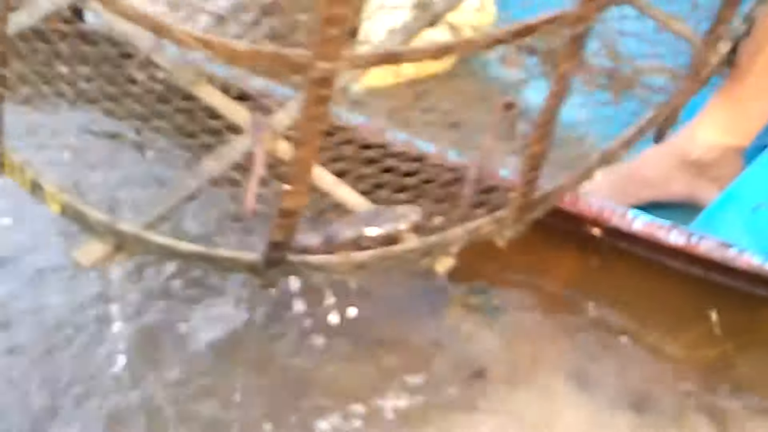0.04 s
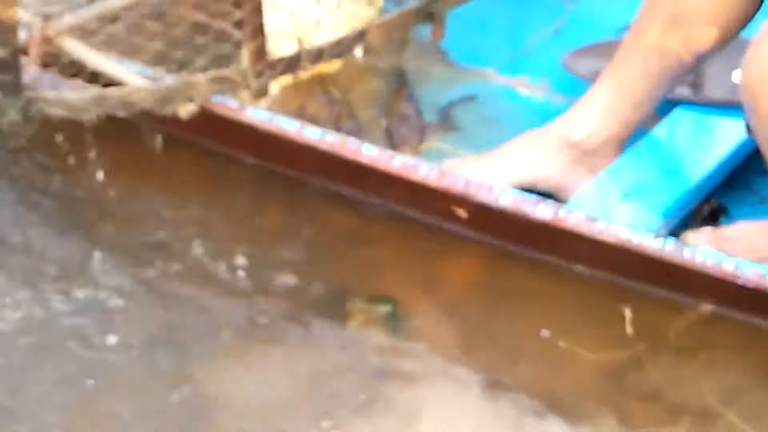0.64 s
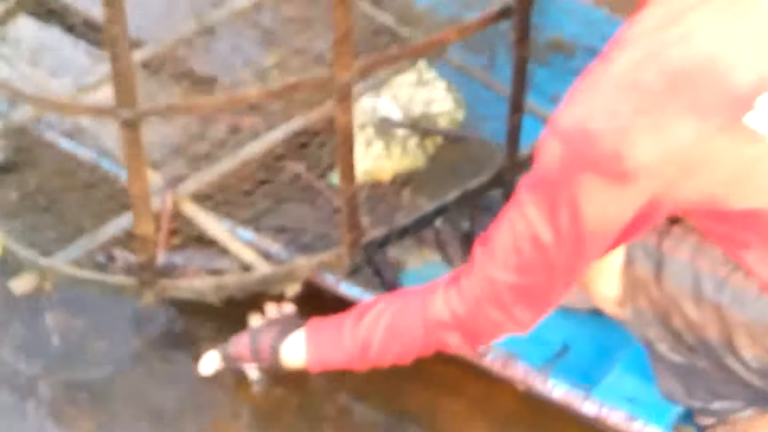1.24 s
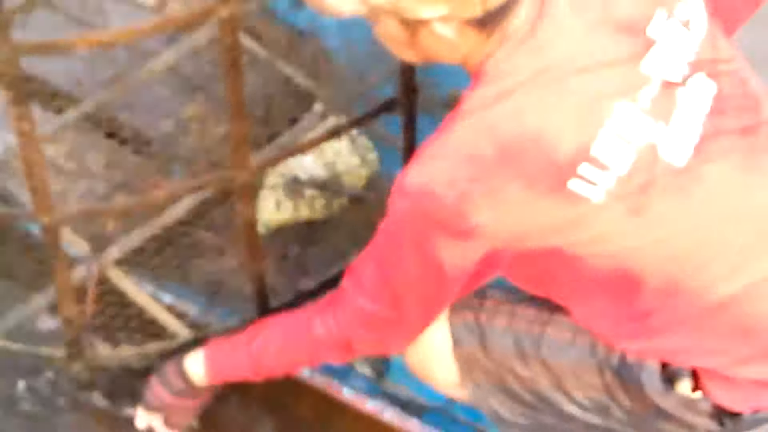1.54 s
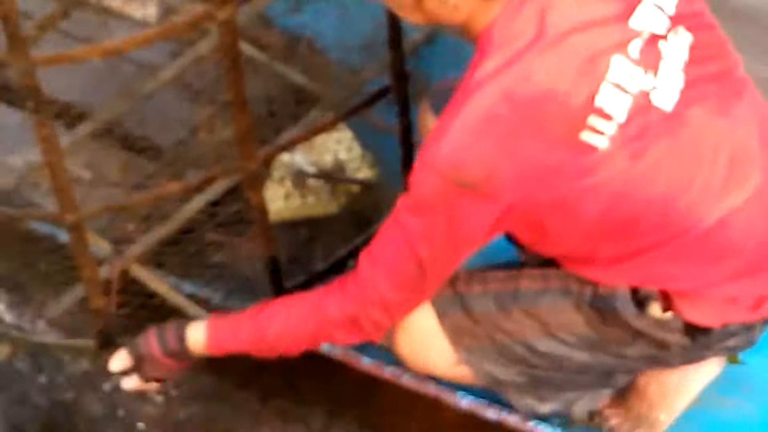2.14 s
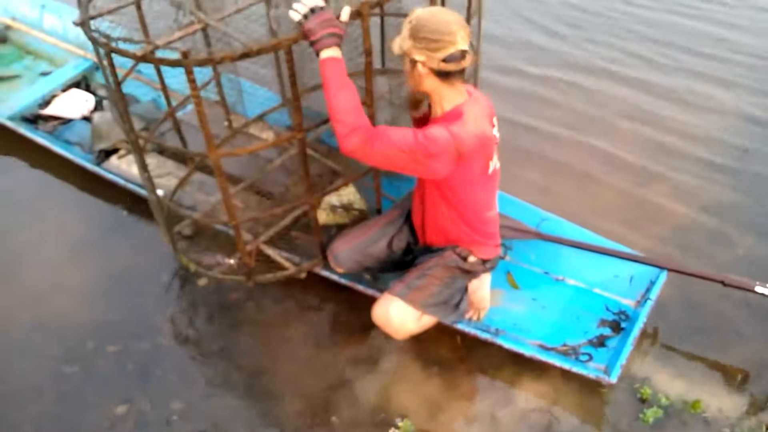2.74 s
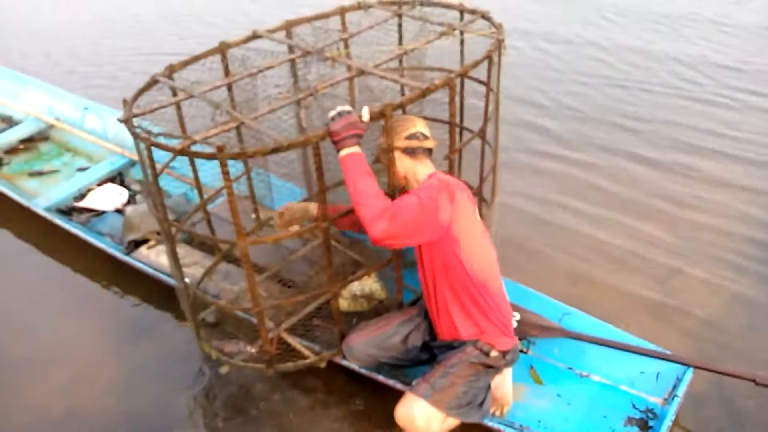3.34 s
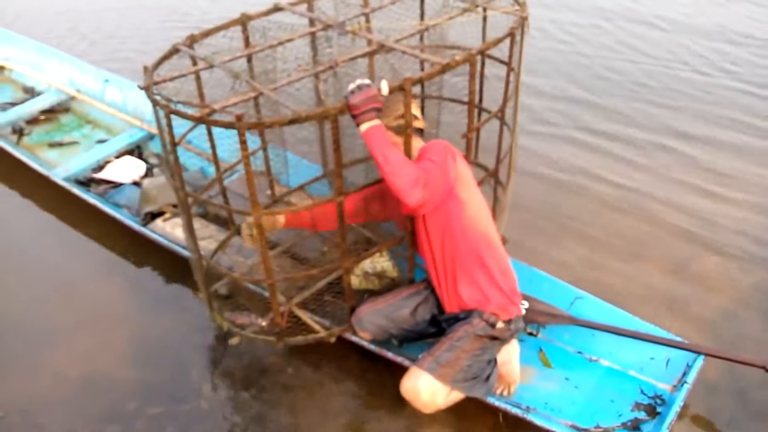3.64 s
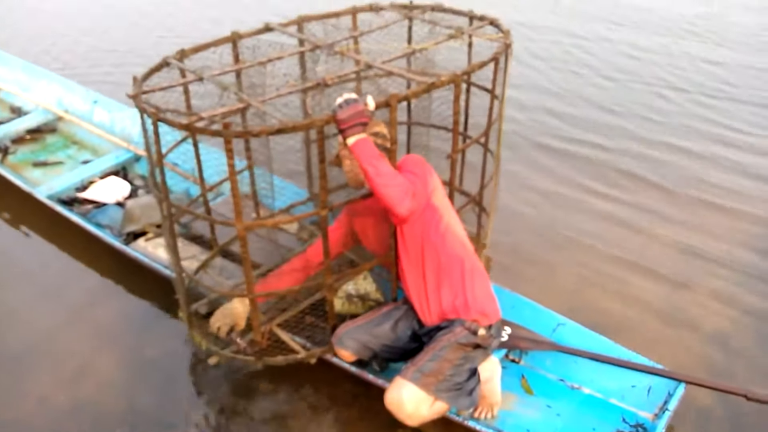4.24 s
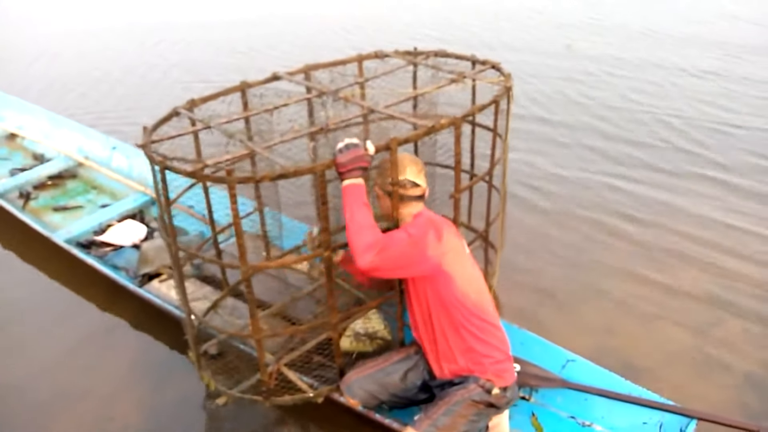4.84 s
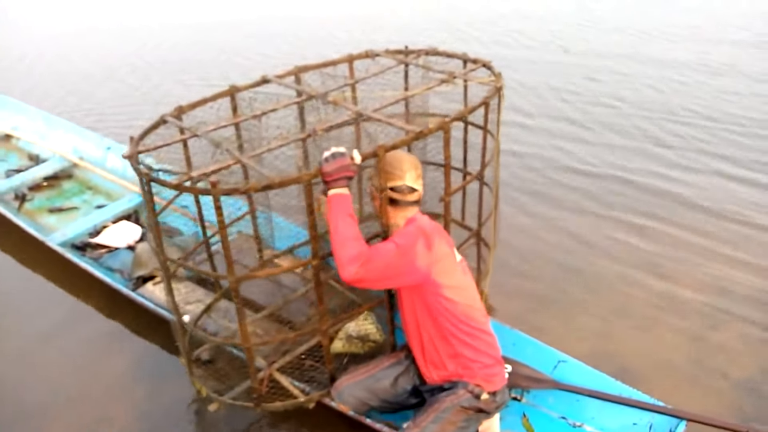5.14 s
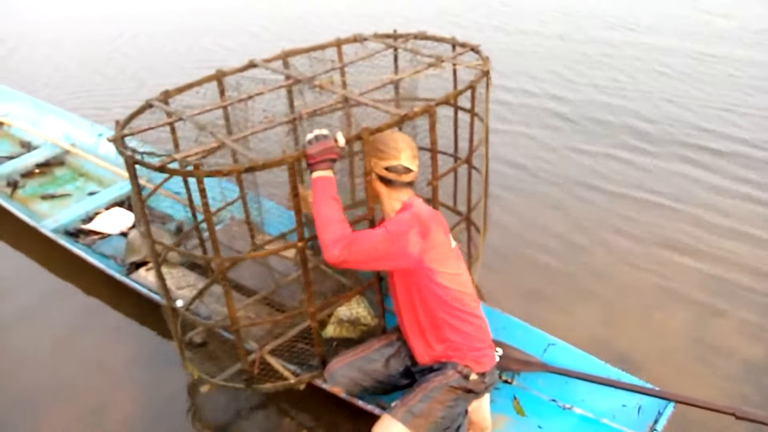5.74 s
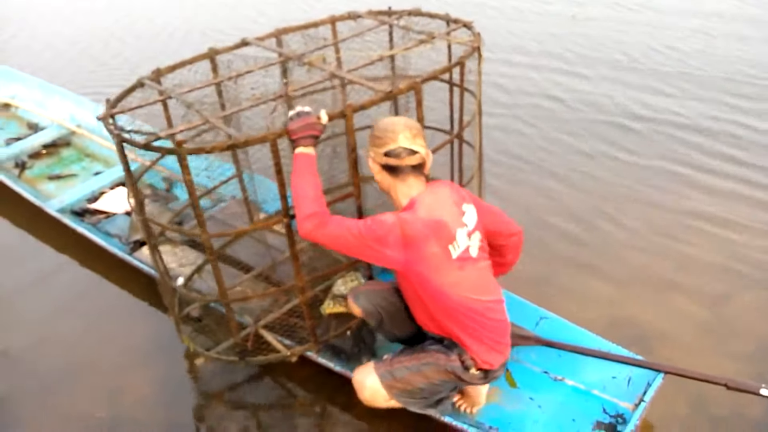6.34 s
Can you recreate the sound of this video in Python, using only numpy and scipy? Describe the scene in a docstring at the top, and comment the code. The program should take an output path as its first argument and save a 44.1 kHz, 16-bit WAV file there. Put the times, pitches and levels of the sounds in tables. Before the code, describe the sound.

A steel-rod fish trap plunges into a calm river with a splash and a gulp, then scrapes along a small boat, whose hull groans and booms low. Water fizzes and drips from the mesh, and the rods clack sharply twice on the rim. Faint insects and birds follow, with a few light clicks and a soft thump last. The boat sounds fairly near, over a far rumble and open-air hiss.

```python
"""A steel-rod fish trap is worked over the side of a small boat on a calm river.
It plunges at 0.5 s with a splash and a gulp of trapped air, then drags along the hull, which
groans and booms as it rocks. Water drains from the mesh, each drip ringing as a bubble, and
near 3.7 s the rods clack twice on the rim. Insects buzz and birds call on the bank; a few rod
clicks and a soft boom come last. A low, far rumble and a hiss of open air run throughout."""
import sys
import numpy as np
from scipy import signal
from scipy.fft import rfft, irfft
from scipy.io import wavfile

SR = 44100
rng = np.random.default_rng(int(sys.argv[2]) if len(sys.argv) > 2 else 0)


def materialize(psi):
    """Save the field psi as 16-bit PCM at rate SR to the path in sys.argv[1].

    A 1-D psi becomes a single channel; in a 2-D psi each row is a channel.
    """
    bounded = np.clip(np.atleast_2d(psi).T, -1, 1)
    quanta = np.round(bounded * 32767).astype(np.int16)
    wavfile.write(sys.argv[1], SR, quanta)


N = 286650
TIME_S = np.arange(N) / SR


# air pockets: t/s, level/dB, f/Hz
AIR_POCKETS = [(.5399, -14, 1137), (.5402, -17, 657), (.541, -23, 1700), (.55, -22.5, 666),
               (.552, -23, 1300), (.5619, -16, 532), (.5735, -23, 765), (.58, -25, 251), (.585, -24.5, 830)]
def gulps(plunge_s=.54, rise=.015, froth_db=-14, muffle_hz=1850):
    """Air pockets shut by the plunge ring briefly, rising as they shrink; water muffles them."""
    out, t = np.zeros(N), np.arange(5000) / SR
    for s, db, hz in AIR_POCKETS:
        peak_s = (1.93 + 69 * (s - plunge_s)) / hz  # later pockets lie deeper, swell for more cycles
        turns = np.cumsum(hz * (1 + rise * np.tanh(t / peak_s - 1))) / SR
        froth = unit_rms(band(rng.standard_normal(len(t)), hz / 2, hz * 1.63))
        add(out, s, amp(db) * swell(t, peak_s) * (np.sin(2 * np.pi * turns) + amp(froth_db) * froth))
    return signal.sosfilt(signal.butter(6, muffle_hz, fs=SR, output="sos"), out)


# trap blows on the hull: t/s, level/dB, f_low/Hz, f_high/Hz, t60 factor
BLOWS = [(.074, -46, 150, 950, 1.4), (.192, -43.5, 171, 420, 2.1), (0.5409, -30, 800, 1750, 0.31),
         (0.5728, -35, 500, 2200, 0.24), (0.6519, -42, 553, 1180, 3.2), (.8635, -41, 294, 2100, 0.94),
         (1.028, -41, 180, 880, 1), (1.059, -41.5, 495, 3060, 1.7), (1.582, -54.5, 550, 1000, .4),
         (1.6603, -47.5, 300, 6000, 0.1), (2.268, -48.5, 70, 1080, .6), (3.1226, -34.5, 150, 850, 0.11),
         (3.6686, -22, 204, 6740, 1.1), (3.7496, -23, 168, 6070, 1.24), (3.7561, -32.5, 169, 3200, 0.19),
         (3.7826, -33, 230, 890, 0.36), (4.174, -46, 130, 510, 0.46), (6.028, -50, 915, 3430, 1.8),
         (6.3332, -49, 130, 1150, 1.3)]
def knocks(tick_hz=5400, tick_s=.00021, hard_hz=6040):
    """Hard contact reaches the high modes and makes the rod tick; a pressing hand shortens the ring."""
    out, t = np.zeros(N), np.arange(8192) / SR
    glide = 1 + .085 * np.exp(-t / .0029)
    tick = swell(t, tick_s) * np.sin(2 * np.pi * tick_hz * t * glide)
    for s, db, low_hz, high_hz, ring in BLOWS:
        body = band(hull(t, ring), low_hz, high_hz)
        tick_db = 14.5 + 8.5 * np.log2(high_hz / hard_hz)
        add(out, s, amp(db) * (body / body[t < .01].std() + amp(tick_db) * tick))
    return out


# clear hull modes: f/Hz, level/dB, t60/s
HULL_MODES = [(135, -14, .16), (197, -12, .15), (280, -2, .18), (368, -1, .08), (587, -10, .11),
              (783, -3, .085), (945, 1, .06), (1163, -8, .075), (1245, -9, .06), (1595, -11, .05),
              (1707, -11, .055), (1910, -11, .055), (2207, -4, .045), (2422, -5, .035), (2560, -5, .035),
              (3394, -5, .04), (3870, -6, .04), (4188, -8, .035), (4730, -6, .028), (5200, -3, .025),
              (5670, -4, .024)]
# octave bands of crowded modes: f/Hz, level/dB, t60/s
HULL_BANDS = [(100, -12, 0.19), (294, 0.5, 0.14), (484, -11, 0.11), (824, -1.5, 0.088), (1500, -2.5, 0.061),
              (2500, -10, 0.037), (3860, -5.5, 0.027), (8600, -27.5, 0.092)]
def hull(t, ring, crowd_db=-3, onset_s=.015):
    """One blow rings a few clear modes among many weaker, crowded ones."""
    hz, db, t60_s = np.transpose(HULL_MODES)[:, :, None]
    sign = (-1) ** np.arange(len(HULL_MODES))[:, None]
    modes = (sign * amp(db - 60 * t / (t60_s * ring)) * np.sin(2 * np.pi * hz * t)).sum(0)
    noise, crowd = rng.standard_normal(len(t)), 0
    for centre_hz, band_db, band_t60_s in HULL_BANDS:
        octave = band(noise, centre_hz / np.sqrt(2), centre_hz * np.sqrt(2))
        crowd = crowd + octave * amp(band_db - 60 * t / (ring * band_t60_s))
    early = t < onset_s
    return modes / modes[early].std() + amp(crowd_db) * crowd / crowd[early].std()


# rocking and leaning loads: t/s, level/dB, f/Hz, swell/s
HULL_LOADS = [(.567, -18.5, 178, 0.0062), (.605, -21, 194, 0.0024), (.858, -31, 149, 0.0075),
              (1.157, -21.5, 106, 0.024), (1.165, -24, 196.6, 0.019), (1.5094, -11.5, 160, 0.0085),
              (1.564, -22, 130.4, 0.01), (1.584, -18.5, 149.5, 0.0076), (1.619, -27, 120, 0.012),
              (1.659, -19.5, 117.3, 0.011), (2.271, -30, 69.4, .0088), (3.1221, -22.5, 130, 0.0021),
              (3.669, -31, 127, 0.009), (3.751, -35.5, 147, 0.0057), (6.334, -34, 186, 0.0045)]
def booms(sag=.24, shudder_db=-17, heave_db=-10, heave_hz=58, full_load_db=-11):
    """Soft loads sound the hull low, heavy ones with brief overtones; the water damps it quickly."""
    out, t = np.zeros(N), np.arange(8000) / SR
    for s, db, hz, peak_s in HULL_LOADS:
        turns = np.cumsum(hz * (1 + sag * (np.exp(-t / peak_s) - .5))) / SR
        shudder = unit_rms(band(rng.standard_normal(len(t)), 140, 280))
        boom = swell(t, peak_s) * (np.sin(2 * np.pi * turns) + amp(shudder_db) * shudder)
        step_db = -8.5 - .45 * (full_load_db - db)  # per overtone; light loads are duller
        boom += amp(heave_db + step_db) * swell(t, peak_s) * np.sin(2 * np.pi * heave_hz * t)
        for k in (1, 2):
            ratio = 1.85 ** k
            overtone = swell(t, .83 * peak_s) ** ratio * np.sin(2 * np.pi * ratio * turns)
            boom += amp(k * step_db) * overtone
        add(out, s, amp(db) * boom)
    return out


def groan(start_s=1.33, length_s=.19, start_hz=98.9, rise_hz=26.2, start_db=-33.5, growth_db=3.5):
    """The trap bears ever harder on the side: the hull judders, rising in pitch and level."""
    load = np.clip((TIME_S - start_s) / length_s, 0, 1)
    turns = np.cumsum(start_hz + rise_hz * load) / SR
    judder = 1 + .35 * unit_rms(band(rng.standard_normal(N), 12.5, 25))
    envelope = amp(start_db + growth_db * load) * hump(start_s, length_s, edge=.3)
    return envelope * judder * np.sin(2 * np.pi * turns)


# rod force on the hull: t/s, relative level/dB
DRAG_FORCE = [(0.61, -39), (0.646, -41.5), (0.654, -38), (0.738, -51), (0.872, -45.5), (1.006, -58),
              (1.042, -43), (1.078, -39), (1.13, -72)]
# scrape spectrum: f/Hz, level/dB
DRAG_SPECTRUM = [(60, -22), (130, 0), (260, 10.5), (410, -6.5), (600, 1), (900, -14), (1200, -2.5),
                 (1500, -18.5), (3200, -22), (8000, -36)]
def drag(gain_db=4):
    """Rust catches and slips on the rim in quick grains."""
    contact = np.interp(TIME_S, [.58, .61, 1.1, 1.16], [0, 1, 1, 0])
    scrape = coloured(grains(N, per_s=1200, spread_db=0), DRAG_SPECTRUM)
    return amp(gain_db) * gain_curve(DRAG_FORCE) * contact * scrape


# loose rods touching: t/s, level/dB
ROD_CONTACTS = [(1.429, -47.5), (3.553, -51.5), (6.043, -49), (6.086, -49.5), (6.278, -53), (6.297, -53.5),
                (6.334, -43.5), (6.42, -49.5)]
def clicks():
    """Rusty rods meet in the hands with a short, gritty click."""
    out = np.zeros(N)
    for s, db in ROD_CONTACTS:
        add(out, s, amp(db) * spray(peak_s=.0017, hz=4700, width=1.16))
    return out


# thrown water: t/s, level/dB, swell/s, f/Hz
THROWN_WATER = [(.002, -48, 0.0092, 4000), (.037, -42.5, 0.0043, 1990), (0.0458, -37, 0.003, 3720),
                (.563, -42, .014, 4200), (.57, -28.5, 0.01, 574), (2.004, -37, 0.0047, 1220),
                (2.015, -39.5, 0.0056, 2540), (2.031, -41.5, 0.0054, 4500), (2.034, -42.5, 0.003, 870),
                (2.176, -50.5, 0.011, 4840), (3.116, -54, 0.027, 4000)]
def splashes():
    """Water thrown up by the trap lands in clouds of tiny impacts."""
    out = np.zeros(N)
    for s, db, peak_s, hz in THROWN_WATER:
        add(out, s, amp(db) * spray(peak_s, hz, width=1.5))
    return out


# drops off the mesh: t/s, level/dB, f/Hz
LARGE_DROPS = [(.978, -45.5, 2480), (1.783, -44.5, 700), (1.833, -46, 1220), (2.165, -52, 1230),
               (2.319, -43, 1400), (3.065, -40, 1860), (3.102, -35.5, 2340), (3.122, -31.5, 2500),
               (3.137, -37, 1250), (3.148, -42, 1190), (3.161, -37.5, 1540), (3.334, -47, 1950),
               (3.396, -41, 1670), (3.457, -42, 2140), (3.467, -45, 3100), (3.467, -44.5, 723),
               (3.591, -46.5, 2630), (6.296, -43, 1920)]
def drips(spatter_db=-11):
    """Each large drop spatters and traps a ringing bubble."""
    out = np.zeros(N)
    for s, db, hz in LARGE_DROPS:
        add(out, s, amp(db) * bubble(hz))
        add(out, s, amp(db + spatter_db) * spray(peak_s=.003, hz=3600, width=1.88))
    return out


# spells of small drops: t_start/s, t_end/s
DRIZZLE_SPANS = [(1.75, 2.36), (3.03, 3.66)]
def drizzle(count=12, max_db=-45.5, spread_db=9, low_hz=1267, high_hz=3250):
    """Small, uneven drops ring as bubbles between the large ones."""
    out = np.zeros(N)
    for start_s, end_s in DRIZZLE_SPANS:
        for k, (jitter, faintness, pitch) in enumerate(rng.random((count, 3))):
            s = start_s + (end_s - start_s) * (k + jitter) / count
            hz = low_hz * (high_hz / low_hz) ** pitch
            add(out, s, amp(max_db - spread_db * faintness) * bubble(hz))
    return out


# mesh shedding water: t/s, relative level/dB, rise/s, hold/s
MESH_POURS = [(0, -59, 0.009, 0.036), (0.517, -54.5, 0.023, 0.57), (1.48, -53, 0.2, 0.19),
              (3.026, -57, 0.037, 0.073), (3.453, -66, 0.11, 0.091)]
# fizz spectrum: f/Hz, level/dB
RUNOFF_SPECTRUM = [(600, -7), (1500, -2.5), (2700, -3.5), (3150, 3), (3700, 2.5), (6000, 2.5), (8000, -4)]
def runoff(gain_db=-2, crackle_db=-3, drain_db_per_s=31.5, trickle_db=-68.5):
    """Water fizzes and crackles off the mesh, each pour thinning to a trickle."""
    power = amp(trickle_db) ** 2
    for s, db, rise_s, hold_s in MESH_POURS:
        onset = np.clip((TIME_S - s) / rise_s, 0, 1)
        drained_s = np.maximum(TIME_S - s - rise_s - hold_s, 0)
        power = power + (onset * amp(db - drain_db_per_s * drained_s)) ** 2
    fizz = rng.standard_normal(N) + amp(crackle_db) * droplets()
    return amp(gain_db) * np.sqrt(power) * coloured(fizz, RUNOFF_SPECTRUM)


def droplets(per_s=450, spread_db=3, sizes=24):
    """Tiny bubbles of many sizes burst at random."""
    out = np.zeros(N)
    bubbles = [bubble(hz, cycles=22) for hz in np.geomspace(1300, 8000, sizes)]
    for when, faintness, pitch in rng.random((int(per_s * N / SR), 3)):
        db = -spread_db * np.log(faintness + .02)
        add(out, when * N / SR, amp(db) * bubbles[int(pitch * sizes)])
    return unit_rms(out)


def bubble(hz, cycles=38, rise=.11):
    """A bubble rings down, rising in pitch as it nears the surface."""
    age = np.arange(0, 1, hz / cycles / SR)
    envelope = amp(-45 * age) * (1 - np.exp(-age / .01))
    return envelope * np.sin(2 * np.pi * cycles * age * (1 + rise * age))


# hull pushing water: t/s, length/s, level/dB
HULL_SHOVES = [(0.52, 0.17, -34), (0.775, .15, -41.5), (1.133, .14, -31), (1.258, 0.47, -35.5)]
def churn(low_hz=75, high_hz=230):
    """Water shoved by the hull makes a dull, lumpy noise."""
    motion = sum(amp(db) * hump(s, length_s, edge=.85) for s, length_s, db in HULL_SHOVES)
    return motion * unit_rms(band(grains(N, per_s=450, spread_db=1.5), low_hz, high_hz))


# near insects: t/s, level/dB, f/Hz, rasp/0-1
NEAR_CHIRPS = [(.15, -72, 7350, .8), (1.559, -63.5, 6800, 0.9), (2.56, -67.5, 7160, 1),
               (3.42, -62, 7100, 1), (3.94, -63, 7200, 1), (4.269, -68.5, 7230, 1),
               (4.56, -70.5, 6700, 0.9), (4.955, -60.5, 6760, 1), (5.359, -64, 6860, 1),
               (5.459, -65, 7290, 0.93), (5.75, -66, 7250, 1), (6.319, -58.5, 7280, 0.9)]
def insects(chorus_span_s=(2.4, 3.4), gap_s=.2, chorus_db=-68.5, chorus_hz=7400):
    """Near insects chirp; farther ones take turns in a brief chorus."""
    out = np.zeros(N)
    for s, db, hz, rasp in NEAR_CHIRPS:
        add(out, s, amp(db) * chirp(hz, rasp))
    for s in np.arange(*chorus_span_s, gap_s):
        add(out, s + rng.uniform(0, gap_s / 2), amp(chorus_db) * chirp(chorus_hz, rasp=.9))
    return out


def chirp(hz, rasp, length_s=.206, max_strokes_per_s=110, sweep_hz=130, rasp_hz=270, start_db=-8):
    """Each wing stroke sounds a high resonance that falls a little; the chirp grows, then stops."""
    t = np.arange(0, length_s, 1 / SR)
    stroke = (max_strokes_per_s * rng.uniform(.9, 1) * t) % 1
    noise = rng.standard_normal((2, SR))[:, :len(t)]
    teeth = signal.sosfilt(signal.butter(4, rasp_hz, fs=SR, output="sos"), noise)
    phase = 2 * np.pi * np.cumsum(hz + sweep_hz * (1 - 2 * stroke)) / SR
    tone = (1 + rasp * unit_rms(teeth[0])) * np.cos(phase) + rasp * unit_rms(teeth[1]) * np.sin(phase)
    pulses = abs(np.sin(np.pi * stroke)) ** 1.3
    growth = amp(start_db * (1 - t / t[-1]) ** 2) * signal.windows.tukey(len(t), .05)
    return growth * unit_rms(tone * pulses)


# drooping bird calls: t/s, length/s, level/dB, f/Hz
BIRD_HOOTS = [(2.543, 0.41, -69, 1450), (6.065, 0.26, -70, 1373)]
def birds(song_s=4.03, gap_s=.33, song_db=-65.5, fade_db=.8, twitter_db=-71.5, echo_db=-5):
    """One bird repeats a fading, arched note, another hoots, others twitter; bank trees echo them."""
    out, t = np.zeros(N), np.arange(4000) / SR
    for k in range(6):
        arch_hz = np.array([2950, 4400, 2950]) * (1 + .04 * rng.uniform(-.99, 1, 3))
        add(out, song_s + k * gap_s, amp(song_db - k * fade_db) * whistle(.072, arch_hz))
    for s, length_s, db, hz in BIRD_HOOTS:
        add(out, s, amp(db) * whistle(length_s, [hz, hz, .8 * hz]))
    for when, *contour in rng.random((16, 4)):
        add(out, 4.2 + 1.7 * when, amp(twitter_db) * whistle(.05, 3200 + 2000 * np.array(contour)))
    trees = rng.standard_normal(len(t)) * np.exp(-t / .014)
    echo = signal.oaconvolve(out, trees / np.linalg.norm(trees))[:N]
    return out + amp(echo_db) * echo


def whistle(length_s, contour_hz):
    """A pure note gliding through its first, middle and last pitch."""
    progress = np.linspace(0, 1, int(length_s * SR))
    hz = np.interp(progress, [0, .5, 1], contour_hz)
    return signal.windows.tukey(len(hz), .3) * np.sin(2 * np.pi * np.cumsum(hz) / SR)


# far rumble: t/s, level/dB
RUMBLE_LEVEL = [(0, -45), (2.3, -46.5), (3, -48), (6.5, -49.5)]
# rumble spectrum: f/Hz, level/dB
RUMBLE_SPECTRUM = [(20, -34.5), (35, -26), (55, 0.5), (95, 4.5), (150, 2), (200, -3), (280, -9.5),
                   (400, -21), (700, -55.5)]
# air over the river: t/s, level/dB
AIR_LEVEL = [(0, -52.5), (2.6, -55.5), (6.5, -57.5)]
# air spectrum: f/Hz, level/dB
AIR_SPECTRUM = [(150, 7.5), (350, 3), (450, -0.5), (570, 3.5), (780, -1), (1000, -3.5), (1500, -6),
                (2200, -11.5), (4000, -13), (6200, -19), (7400, -7.5), (8200, -31.5)]
def surroundings():
    """A low, far rumble under the soft hiss of open air."""
    rumble = gain_curve(RUMBLE_LEVEL) * coloured(rng.standard_normal(N), RUMBLE_SPECTRUM)
    air = gain_curve(AIR_LEVEL) * coloured(rng.standard_normal(N), AIR_SPECTRUM)
    return rumble + air


def spray(peak_s, hz, width):
    """A short cloud of tiny impacts."""
    t = np.arange(6000) / SR
    impacts = grains(len(t), per_s=8300, spread_db=-10)
    return np.sqrt(swell(t, peak_s)) * unit_rms(band(impacts, hz / width, hz * width))


def grains(size, per_s, spread_db):
    """Random clicks of uneven strength."""
    strength = amp(spread_db * np.minimum(rng.exponential(1, size), 4))
    return unit_rms(rng.standard_normal(size) * strength * (rng.random(size) < per_s / SR))


def swell(t, peak_s):
    """Rises to 1 at peak_s, then dies away."""
    return (t / peak_s * np.exp(1 - t / peak_s)) ** 2


def hump(start_s, length_s, edge):
    """One rise and fall; a small edge flattens the top."""
    progress = np.clip((TIME_S - start_s) / length_s, 0, 1)
    return (4 * progress * (1 - progress)) ** edge


def band(x, low_hz, high_hz):
    """Band-pass, upper edge twice as steep as the lower."""
    highpass = signal.butter(2, low_hz, "high", fs=SR, output="sos")
    lowpass = signal.butter(4, high_hz, fs=SR, output="sos")
    return signal.sosfilt(np.vstack([highpass, lowpass]), x)


def coloured(x, spectrum):
    """Shapes x by a spectrum on a log-frequency axis, at rms 1."""
    hz, db = np.transpose(spectrum)
    bins_hz = np.fft.rfftfreq(len(x), 1 / SR)
    gain = amp(np.interp(np.log(bins_hz + 1), np.log(hz + 1), db))
    return unit_rms(irfft(rfft(x) * gain, len(x)))


def gain_curve(points):
    return amp(np.interp(TIME_S, *np.transpose(points)))


def amp(db):
    return 10 ** (np.asarray(db) / 20)


def unit_rms(x):
    return x / np.sqrt(np.mean(x ** 2) + 1e-20)


def add(mix, s, sound):
    part = mix[max(round(s * SR), 0):][:len(sound)]
    part += sound[:len(part)]


def scene():
    """Boat, water and river bank in mono."""
    boat = knocks() + booms() + groan() + drag() + clicks()
    water = gulps() + splashes() + drips() + drizzle() + runoff() + churn()
    return (boat + water + insects() + birds() + surroundings())[None]


def record(dry, low_cut_hz=38, high_cut_hz=8050):
    """Sheds the deepest bass and cuts the top treble steeply."""
    thinned = signal.sosfilt(signal.butter(2, low_cut_hz, "high", fs=SR, output="sos"), dry)
    lowpass = signal.firwin(111, high_cut_hz, window=("kaiser", 8), fs=SR)
    return signal.oaconvolve(thinned, lowpass[None], "same")


dry = scene()
out = record(dry)
materialize(out)
```